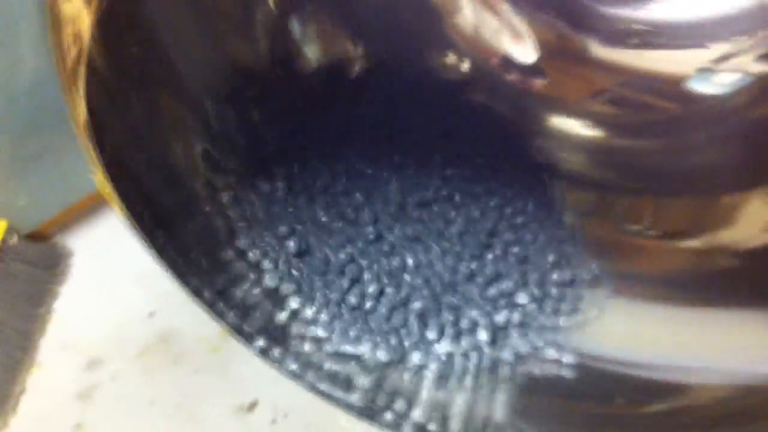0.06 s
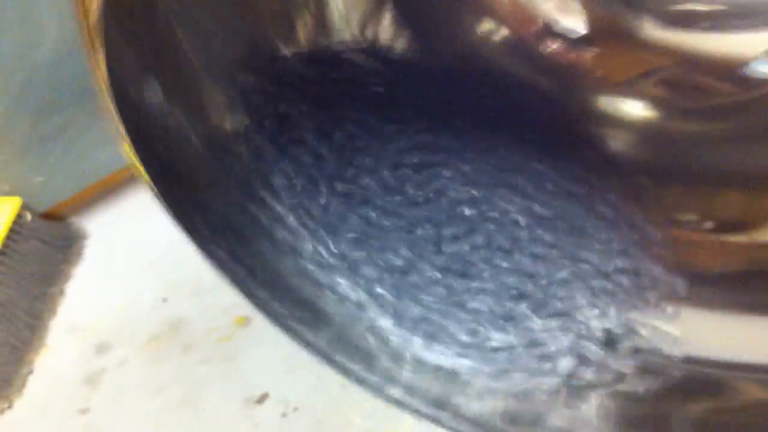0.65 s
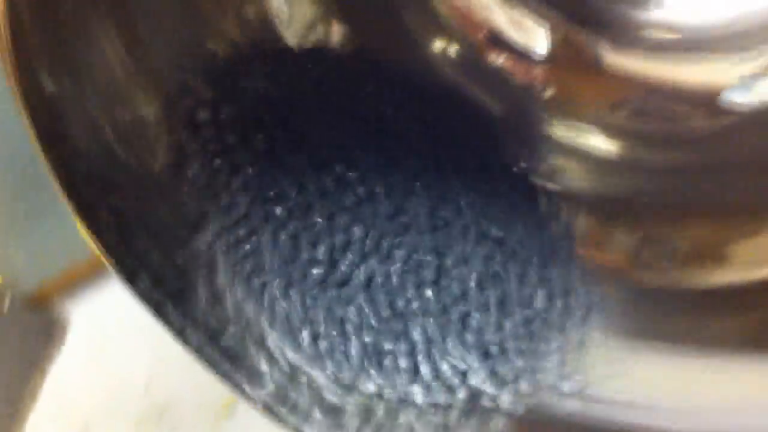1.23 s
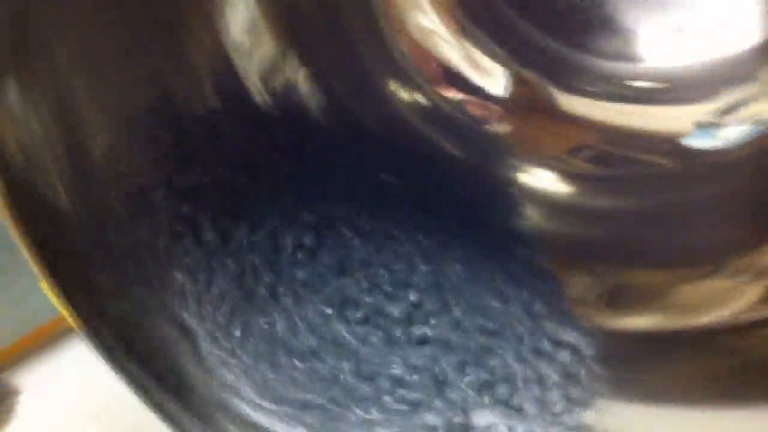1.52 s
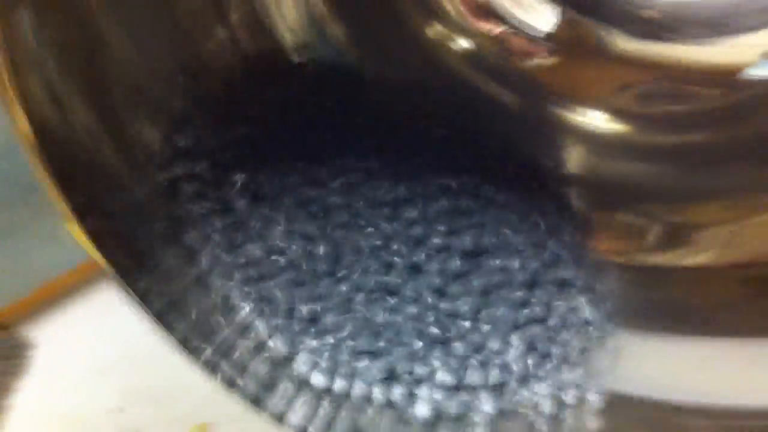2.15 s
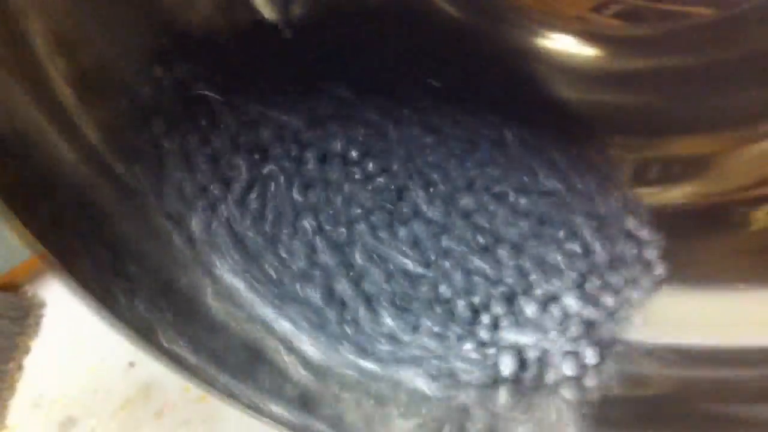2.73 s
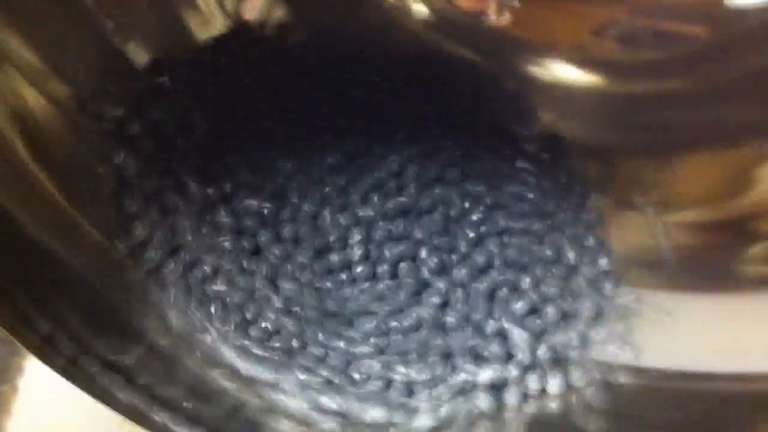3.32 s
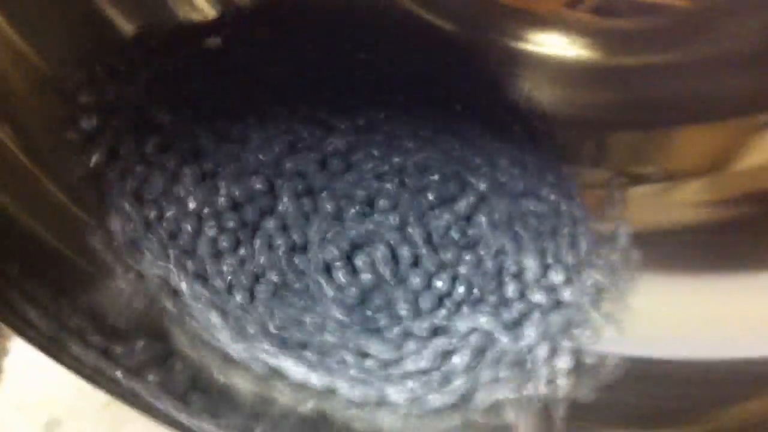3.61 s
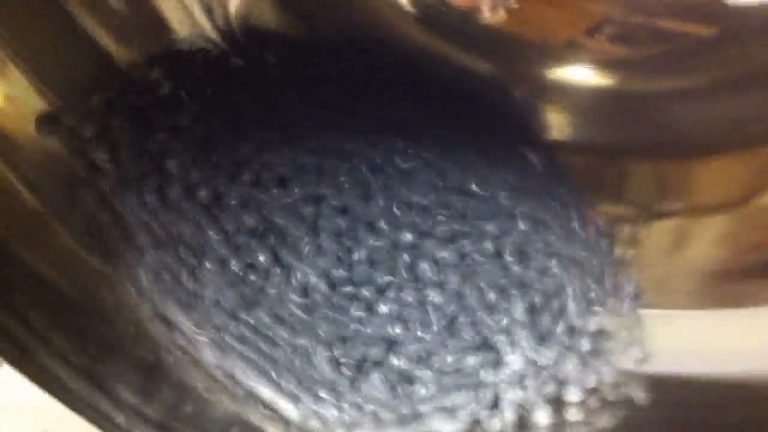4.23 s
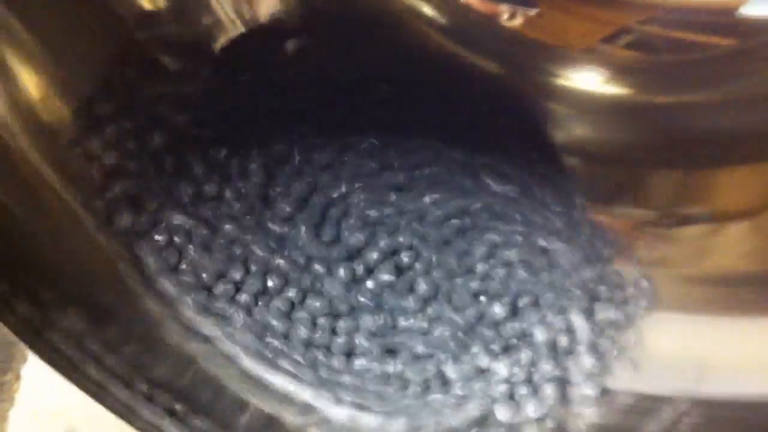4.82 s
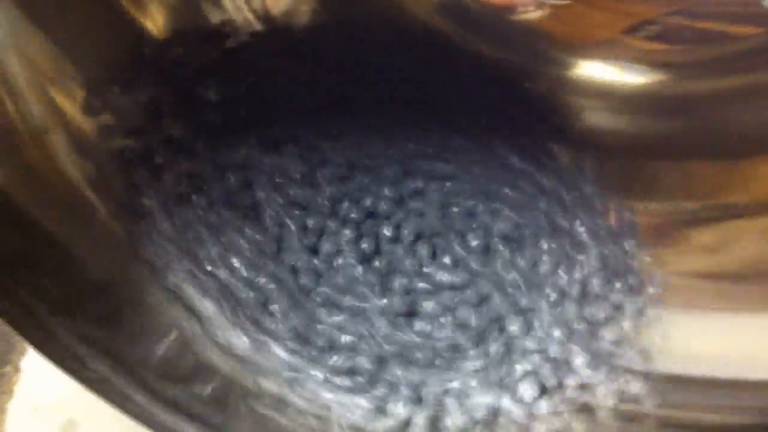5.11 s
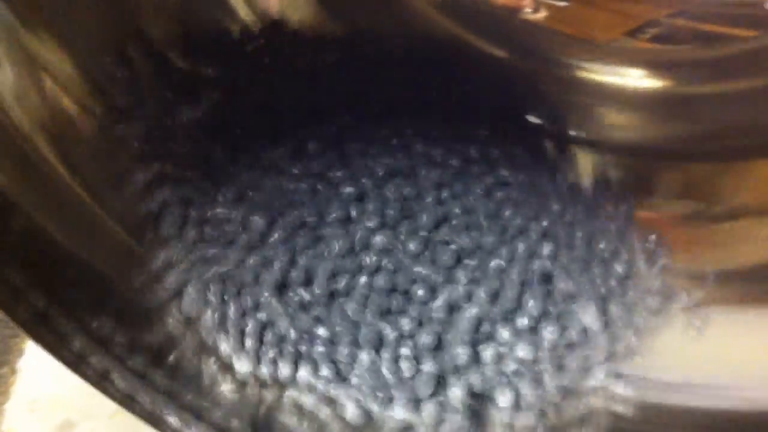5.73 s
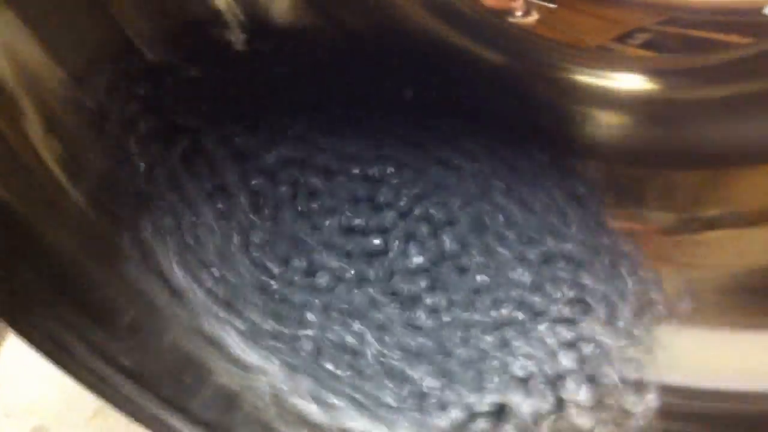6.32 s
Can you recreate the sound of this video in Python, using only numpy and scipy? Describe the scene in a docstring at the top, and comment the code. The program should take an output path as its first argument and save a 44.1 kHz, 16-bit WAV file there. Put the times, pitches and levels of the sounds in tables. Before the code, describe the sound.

A steady, bright rattle and hiss of pellets sliding inside a rotating metal drum, with a rumbling drive and occasional dull bumps.

```python
"""A dense patter and hiss: thousands of small hard pellets a second tumble in a tilted, turning steel drum.
They strike the shell, ring the hollow near 3 kHz and slide over each other, close to a mono microphone.
Underneath, the drive rumbles and whines. The drum knocks on its mount, with softer bumps between,
and three times the rubbing heap sets the shell singing briefly."""
import sys
import numpy as np
from scipy import signal
from scipy.fft import rfft, irfft
from scipy.io import wavfile
from scipy.ndimage import uniform_filter1d, minimum_filter1d

SR = 44100
rng = np.random.default_rng(int(sys.argv[2]) if len(sys.argv) > 2 else 0)


def log_audio(samples):
    """Write samples as a 16-bit WAV file to the path given in sys.argv[1]."""
    # one column per channel
    frames = np.atleast_2d(samples).T
    # limit to full scale, then quantise
    limited = np.clip(frames, -1, 1)
    pcm = np.round(limited * 32767).astype(np.int16)
    wavfile.write(sys.argv[1], SR, pcm)


N = 289296
TIME = np.arange(N) / SR


def gain_of(db):
    """Decibels to amplitude."""
    return 10 ** (np.asarray(db) / 20)


def unit_rms(x):
    """Scales to rms 1."""
    return x / np.sqrt(np.mean(x ** 2) + 1e-20)


def add(mix, start_s, sound):
    """Mixes a sound in at start_s."""
    part = mix[round(start_s * SR):][:len(sound)]
    part += sound[:len(part)]


def follow(table):
    """Interpolates (time_s, value) rows at every sample."""
    return np.interp(TIME, *np.transpose(table))


def wander(top_hz):
    """Random drift, rms 1, rolled off above top_hz."""
    hz = np.fft.rfftfreq(N, 1 / SR)
    return unit_rms(irfft(rfft(rng.standard_normal(N)) / (1 + (hz / top_hz) ** 2), N))


def ring(x, colour, modes=(), size=16384):
    """Minimum-phase body filter: broad colour plus resonances, output rms 1."""
    hz = abs(np.fft.fftfreq(size, 1 / SR))
    knots_hz, db = np.transpose(colour)
    gain = gain_of(np.interp(np.log(hz + 1), np.log(knots_hz), db))
    gain /= 1 + (hz / (2 * knots_hz[-1])) ** 4
    for centre_hz, width_hz, lift_db in modes:
        gain *= np.sqrt(1 + (gain_of(lift_db) ** 2 - 1) / (1 + (2 * (hz - centre_hz) / width_hz) ** 2))
    spectrum = np.exp(signal.hilbert(np.log(gain + 1e-6)).conj())
    response = np.fft.ifft(spectrum).real[:size // 2]
    return unit_rms(signal.oaconvolve(x, response)[:len(x)])


def impacts(per_s, spread_db):
    """Random pellet blows: many light, a few heavy."""
    strength = gain_of(spread_db * np.minimum(rng.exponential(1, N), 5))
    return strength * rng.choice([-1, 1], N) * (rng.random(N) < per_s / SR)


# pellet-on-steel spectrum: freq_hz, level_db
PATTER_COLOUR = [(500, -33.5), (900, -22.5), (1020, -14.5), (1400, -12), (1720, -7.5), (2050, -0.2),
                 (2450, -2.5), (3550, -2.5), (4050, -6), (4700, -12.5), (5500, -19), (7500, -35)]
# steel shell resonances: centre_hz, width_hz, lift_db
SHELL_MODES = [(963, 6.9, 11), (1183.5, 11.3, 8.5), (1299, 17, 8.5), (1478, 63, 4.5), (1610, 39, 3),
               (1813, 28, 7.5), (2153, 27, 4), (2293, 30, 3.5), (3310, 23, 0.5), (3460, 50, 4),
               (3836, 50, 4), (4100, 80, 1.5), (4410, 37, 1)]


def patter(avalanche):
    """Pellets strike the steel and excite the shell modes."""
    blows = impacts(per_s=7000, spread_db=2.0) * gain_of(0.5 * avalanche)
    return ring(blows, PATTER_COLOUR, SHELL_MODES)


# spectrum of the air in the drum: freq_hz, level_db
HOLLOW_COLOUR = [(1500, -43), (2400, -19), (2650, -4), (2850, 1), (3080, 2.5), (3280, -3.5), (3700, -15),
                 (5000, -38)]
# air resonances: centre_hz, width_hz, lift_db
AIR_MODES = [(2984, 58, 4.2), (2870, 36, 2.8), (3310, 55, 1.8)]


def hollow(avalanche):
    """Pellet blows ring the air in the drum near 3 kHz, with a slight flutter."""
    flutter_db = 0.23 * avalanche + 0.35 * wander(top_hz=20)
    blows = impacts(per_s=8000, spread_db=2.0) * gain_of(flutter_db)
    return ring(blows, HOLLOW_COLOUR, AIR_MODES)


def wall_echoes(x, t60_s, size=2048):
    """Echoes between close steel walls; each pellet lies elsewhere, so only the energy decay is shared."""
    tail = rng.standard_normal(size) * gain_of(-60 * np.arange(size) / SR / t60_s)
    energy = signal.oaconvolve(x ** 2, tail ** 2 / np.sum(tail ** 2))[:N]
    return x + np.sqrt(abs(energy)) * rng.standard_normal(N)


# pellet-on-pellet spectrum: freq_hz, level_db
SLIDE_COLOUR = [(1500, -34), (3500, 0), (4800, 0.5), (5700, -2), (6500, -3), (7500, -7.5), (10000, -14.5),
                (12200, -19), (14000, -27), (15700, -55)]
# slow trim of the hiss: time_s, gain_db
SLIDE_TRIM = [(0, 2), (0.5, -0.7), (1.0, 1.3), (1.85, 0.5), (2.1, 0.2), (6.56, -0.3)]


def sliding(avalanche):
    """Pellets rub and tick on each other, merging into a hiss."""
    flutter_db = 0.92 * avalanche + 0.2 * wander(top_hz=30)
    ticks = impacts(per_s=16000, spread_db=1.1) * gain_of(flutter_db)
    return gain_of(follow(SLIDE_TRIM)) * ring(wall_echoes(ticks, t60_s=0.022), SLIDE_COLOUR)


# clumps breaking loose: middle_s, length_s, lift_db
CLUMP_FALLS = [(0.444, 0.079, 3), (1.82, 0.084, 4), (2.073, 0.14, 2.5), (2.354, 0.04, 3.5),
               (3.028, 0.08, 3), (4.825, 0.042, 2.5), (5.396, 0.05, 3.5), (5.983, 0.085, 5.5),
               (6.324, 0.055, 3)]


def clumps():
    """Each falling clump lifts the level in one smooth arch; returns dB."""
    total_db = np.zeros(N)
    for middle_s, length_s, lift_db in CLUMP_FALLS:
        total_db += lift_db * np.cos(np.pi * np.clip((TIME - middle_s) / length_s, -.5, .5))
    return total_db


# heap building and slumping about once a second: time_s, flow_db
HEAP_FLOW = [(0, 0), (0.45, 1), (1.45, 0.54), (1.77, 1), (2.18, -1.5), (2.52, -1.5), (2.7, -0.1),
             (3.05, 0.5), (3.24, -1.8), (3.55, 1.9), (3.88, -2.1), (4.08, 0.9), (4.33, 1.1), (4.93, -1.1),
             (5.25, 1.3), (5.78, -0.3), (5.98, 0.2), (6.56, 1)]


def pellets():
    """The heap sheds small avalanches; its flow and clumps modulate patter, hollow and hiss together."""
    avalanche = wander(top_hz=39.8)
    flow_db = follow(HEAP_FLOW) + 0.59 * wander(top_hz=20)
    clump_db = clumps()
    contact_db = 0.93 * flow_db + 0.38 * clump_db
    steel = gain_of(-16 + contact_db) * patter(avalanche)
    air = gain_of(-15 + 0.62 * flow_db + clump_db) * hollow(avalanche)
    hiss = gain_of(-26.5 + contact_db) * sliding(avalanche)
    return steel + air + hiss


# stand spectrum: freq_hz, level_db
STAND_COLOUR = [(20, -24), (50, -39), (78, -23), (122, 0.5), (190, 2.5), (290, -0.5), (420, 5), (505, -1),
                (750, 2.5), (900, -4.5), (1600, -22.5)]
# stand resonances: centre_hz, width_hz, lift_db
RUMBLE_MODES = [(147.8, 11, 9.4), (246, 13, 3.4), (321, 9, 3.6), (399, 87, 4), (431, 11, 3.9),
                (534, 13, 4.3), (626, 27, 3.5)]
# rumble under drive load: time_s, level_db
DRIVE_LOAD = [(0, -36.5), (0.4, -32), (0.7, -34.5), (1.9, -34.5), (2.5, -36.5), (3.45, -36), (3.75, -40),
              (4.1, -36.5), (4.85, -38.5), (5.1, -35), (6.56, -34.5)]


def drive_rumble(bass_hz=184, bass_db=-33.5):
    """The turning load shakes the stand; the bass drones at one level, the rest follows the load."""
    shake = rng.standard_normal(N) * gain_of(1.6 * wander(top_hz=22.1))
    stand = ring(shake, STAND_COLOUR, RUMBLE_MODES)
    bass = signal.sosfiltfilt(signal.butter(3, bass_hz, fs=SR, output="sos"), stand)
    return gain_of(bass_db) * bass + gain_of(follow(DRIVE_LOAD)) * (stand - bass)


# motor whine envelope: time_s, level_db
WHINE_LEVEL = [(0, -51), (0.5, -44), (1.4, -46), (2.5, -47), (3.68, -51), (3.82, -35), (3.96, -46),
               (4.38, -52), (4.49, -35), (4.62, -49), (5.05, -42), (6.56, -42.5)]


def motor_whine(pitch_hz=458):
    """One motor tone, wavering in pitch and level."""
    cycles = np.cumsum(pitch_hz + 5 * wander(top_hz=18.6)) / SR
    tone = unit_rms(np.sin(2 * np.pi * cycles) * gain_of(4.0 * wander(top_hz=22)))
    return gain_of(follow(WHINE_LEVEL)) * tone


# mount clack spectrum: freq_hz, level_db
MOUNT_COLOUR = [(60, -42), (100, -26), (220, 2), (500, -4), (800, -5.5), (1300, -15)]
# mount resonances: centre_hz, width_hz, lift_db
MOUNT_MODES = [(380, 46, 4.5), (670, 54, 12)]
# drum bumping its mount: start_s, boom_db, pitch_hz, t60_s, clack_db
BUMPS = [(1.640, -31, 150, 0.25, -24), (1.732, -27.5, 187, 0.12, -29), (2.612, -34, 174, 0.13, -34),
         (2.762, -28.5, 152, 0.28, -26.5), (3.001, -24, 145, 0.17, -28), (3.749, -33, 183, 0.17, -46),
         (3.918, -29, 155.6, .34, -28), (4.134, -21.5, 145, 0.14, -38), (5.035, -29.5, 151.2, 0.52, -27.5),
         (5.792, -26.5, 186, 0.099, -34), (6.178, -23.5, 149.6, 0.4, -33), (6.388, -29, 159, 0.12, -47)]


def knocks(rise_s=0.026):
    """Each bump swells into a soft boom of the heavy drum, with a short dull clack from the mount."""
    out, t = np.zeros(N), np.arange(SR // 2) / SR
    for start_s, boom_db, pitch_hz, t60_s, clack_db in BUMPS:
        swell = np.sin(np.pi / 2 * np.minimum(t / rise_s, 1)) ** 2
        decay = gain_of(-60 * np.maximum(t - rise_s, 0) / t60_s)
        boom = swell * decay * np.sin(2 * np.pi * pitch_hz * t)
        rattle = ring(rng.standard_normal(len(t)), MOUNT_COLOUR, MOUNT_MODES)
        clack = rattle * (1 - np.exp(-t / 0.0014)) * np.exp(-t / 0.021)
        add(out, start_s, gain_of(boom_db) * boom + gain_of(clack_db) * clack)
    return out


# shell tone swells: start_s, length_s, peak_db
SHELL_SWELLS = [(1.967, 0.15, -31), (4.25, 0.056, -33), (5.314, 0.15, -36)]


def singing():
    """The rubbing heap briefly excites the lowest shell mode."""
    out, pitch_hz = np.zeros(N), SHELL_MODES[0][0]
    for start_s, length_s, peak_db in SHELL_SWELLS:
        t = np.arange(round(length_s * SR)) / SR
        arch = gain_of(peak_db) * np.sin(np.pi * t / length_s)
        add(out, start_s, arch * np.sin(2 * np.pi * pitch_hz * t))
    return out


def scene():
    """All sources at one point, on two identical channels."""
    mono = pellets() + drive_rumble() + motor_whine() + knocks() + singing()
    return np.array([mono, mono])


def record(dry):
    """Microphone bass cut at 45 Hz, fast limiter at full scale, low-pass at 15.75 kHz."""
    heard = signal.sosfilt(signal.butter(2, 45, "highpass", fs=SR, output="sos"), dry)
    allowed_gain = 1 / np.maximum(abs(heard), 1)
    limited = heard * uniform_filter1d(minimum_filter1d(allowed_gain, size=201), size=201)
    lowpass = signal.firwin(1023, 15750, window=("kaiser", 9), fs=SR)
    return signal.oaconvolve(limited, lowpass[None], "same")


dry = scene()
out = record(dry)
log_audio(out)
```